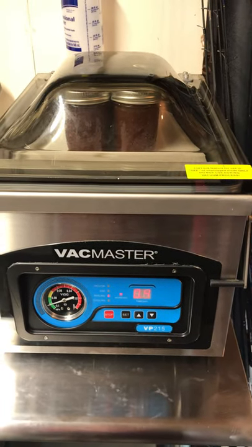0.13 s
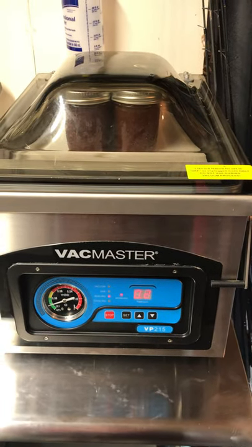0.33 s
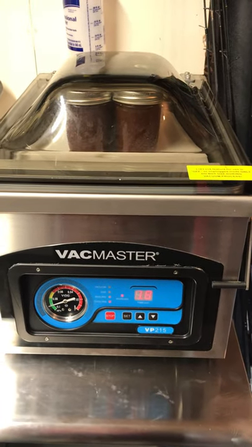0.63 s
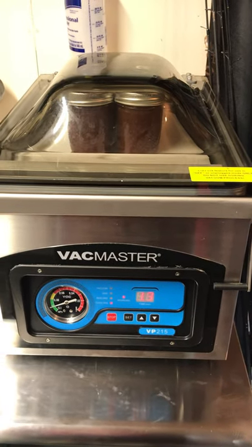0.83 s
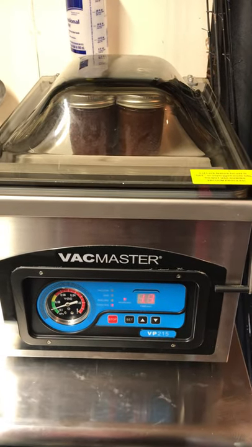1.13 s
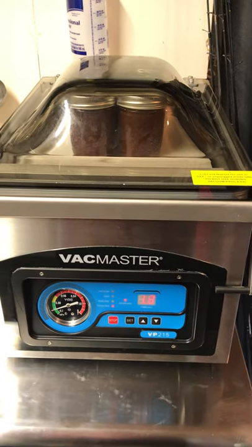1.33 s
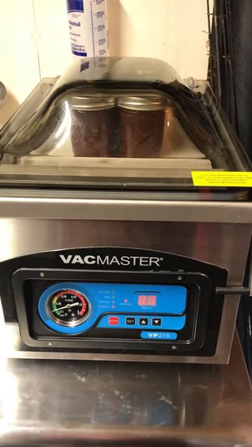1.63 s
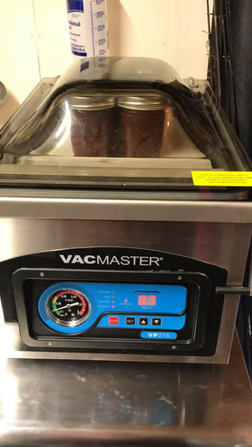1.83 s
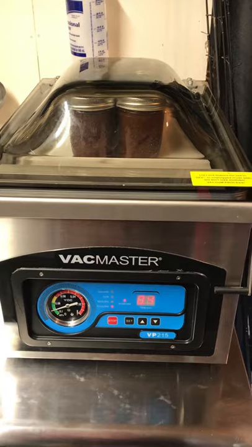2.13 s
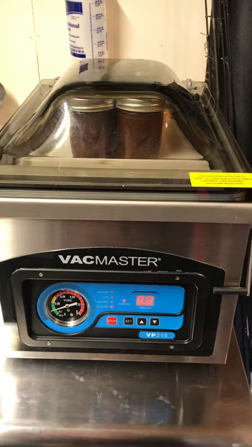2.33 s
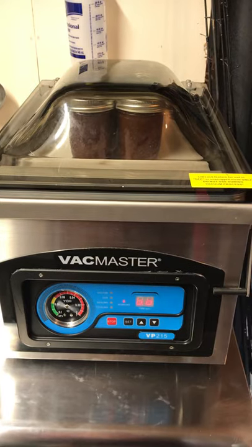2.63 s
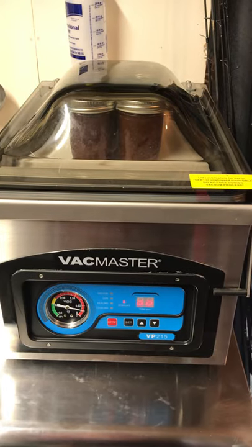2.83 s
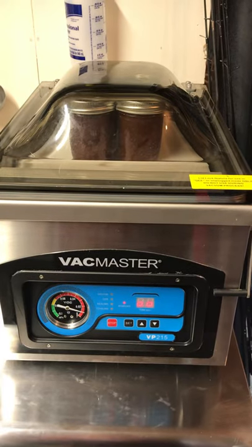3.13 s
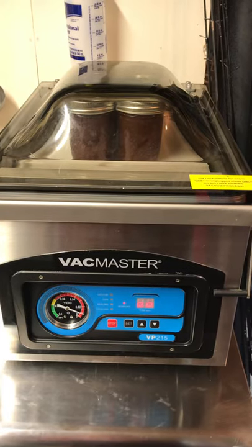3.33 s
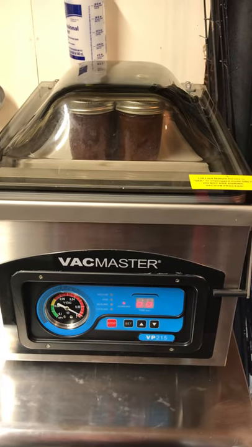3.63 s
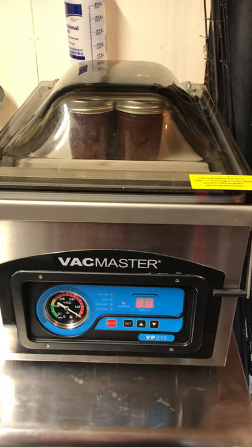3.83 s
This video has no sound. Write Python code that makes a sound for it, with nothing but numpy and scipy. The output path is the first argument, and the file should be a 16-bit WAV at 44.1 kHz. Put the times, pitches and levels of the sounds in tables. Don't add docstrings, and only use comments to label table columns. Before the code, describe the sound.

Air roars back into a chamber vacuum machine, close in a small room. It begins with faint electrical hum, soft hiss and a low pump rumble dying away. At 0.6 s a relay clicks with a tiny bounce. Around 2.6 s a brief light chatter leads into a loud metallic valve slam, then a bright, turbulent rush surges, drops back, swells unevenly and grows duller towards 4 s.

```python
import sys
import numpy as np
from scipy import signal
from scipy.fft import rfft, irfft
from scipy.io import wavfile
from scipy.ndimage import uniform_filter1d

SR = 44100
rng = np.random.default_rng(int(sys.argv[2]) if len(sys.argv) > 2 else 0)


def master(y):
    cut = np.clip(np.atleast_2d(y).T, -1, 1)
    pcm = np.round(cut * 32767)
    wavfile.write(sys.argv[1], SR, pcm.astype(np.int16))


def to_linear_factor(level_db):
    exponent = np.asarray(level_db, float) / 20
    return 10 ** exponent


N = 176400


def evened(x):
    return x / np.sqrt(np.mean(x ** 2) + 1e-20)


def read(points, hz):
    f, value = np.transpose(points)
    return np.interp(np.log(hz + 1), np.log(f + 1), value)


def shaped(gain, patch_db, gust_db):
    real, imag, wander = rng.standard_normal((N // 256 + 5, 513, 3)).T
    gusts = evened(uniform_filter1d(wander[0], size=9))
    patches = uniform_filter1d(wander, size=14, axis=0)
    patches = evened(uniform_filter1d(patches, size=12, axis=1))
    spectra = (real + 1j * imag) * gain * to_linear_factor(patch_db * patches + gust_db * gusts)
    return evened(signal.istft(spectra, nperseg=1024, noverlap=768)[1][:N])


def peaks(table, hz, order):
    return sum(to_linear_factor(db) ** 2 / (1 + (2 * (hz - f) / w) ** order) for f, w, db in table)


def coloured(x, gain_of_hz):
    return irfft(rfft(x) * gain_of_hz(np.fft.rfftfreq(N, 1 / SR)), N)


def tones(table):
    total = np.zeros(N)
    for f, width, db in table:
        noise = rng.standard_normal(N)
        total += to_linear_factor(db) * evened(coloured(noise, lambda hz: np.sqrt(peaks([(f, width, 0)], hz, order=4))))
    return total


# [f/Hz, t60/s]
ROOM_DECAY = [(200, 0.28), (1000, 0.3), (4000, 0.35), (14000, 0.21)]


def room(x, wet_db):
    size = SR // 2
    taps = np.zeros(size)
    at = np.arange(100, size - 12, 12)
    taps[at + rng.integers(0, 12, len(at))] = rng.choice([-1., 1.], len(at))
    hz, t, spectra = signal.stft(taps, SR, nperseg=256)
    fade = to_linear_factor(-60 * t / read(ROOM_DECAY, hz)[:, None])
    tail = signal.istft(spectra * fade, SR, nperseg=256)[1]
    return x + to_linear_factor(wet_db) * signal.fftconvolve(x, tail / np.linalg.norm(tail))[:N]


def strike(hits, modes, crack, crack_db, crack_t60, wet_db, rise_s=0.00016):
    detune = .008
    t, out = np.arange(SR // 3) / SR, np.zeros(N)
    hz = np.fft.rfftfreq(1024, 1 / SR)
    noise = shaped(to_linear_factor(read(crack, hz))[:, None], 0, 0)
    for s, level_db in hits:
        ring = np.zeros(len(t))
        for f, db, t60 in modes:
            near_hz = f * (1 + detune * rng.uniform(-1, 1))
            ring += to_linear_factor(db - 60 * t / t60) * np.sin(2 * np.pi * (near_hz * t + rng.random()))
        at = round(s * SR)
        hit = .4 * ring + to_linear_factor(crack_db - 60 * t / crack_t60) * noise[at:at + len(t)]
        out[at:at + len(t)] += to_linear_factor(level_db) * hit * np.minimum(t / rise_s, 1)
    return room(out, wet_db)


# [f/Hz, width/Hz, level/dB]
HOUSING = [(600, 70, -89), (1030, 90, -95), (1120, 40, -83), (1238, 40, -78), (1310, 70, -86),
           (2800, 300, -100), (3500, 400, -97), (4400, 120, -99), (5190, 40, -93), (5338, 100, -88),
           (6170, 200, -101), (7250, 300, -107)]
# [f/Hz, width/Hz, level/dB]
STEADY_TONES = [(59.2, 4, -76), (119.5, 6, -78), (4097, 14, -88), (1238, 3, -87), (7079, 14, -95),
                (531, 6, -87)]
# [f/Hz, width/Hz, level/dB]
FADING_TONES = [(226, 6, -73), (258.4, 6, -71), (290.7, 6, -76), (377, 10, -81), (608, 10, -81),
                (727, 14, -82)]


def hum():
    motor_hz, waver_share = 58.97, .0002
    closed_s, open_db, bright_from_hz = .6, -11, 2000
    sway_db, fade_db_per_s = 1.5, -4.5
    t = np.arange(N) / SR
    waver = evened(uniform_filter1d(rng.standard_normal(N), size=9000))
    turns = np.cumsum(motor_hz * (1 + waver_share * waver)) / SR
    harmonics = np.arange(8, 127)
    sizes = np.sqrt(2 * peaks(HOUSING, harmonics * motor_hz, order=4))
    sizes = sizes * to_linear_factor(.7 * rng.standard_normal(len(harmonics)))
    closing = np.where(t < closed_s, to_linear_factor(open_db), 1)
    buzz = np.zeros(N)
    for k, size in zip(harmonics, sizes):
        wave = size * np.sin(2 * np.pi * (k * turns + .3 * rng.random()))
        buzz += wave * (closing if k * motor_hz > bright_from_hz else 1)
    return buzz * to_linear_factor(sway_db * waver) + tones(STEADY_TONES) + tones(FADING_TONES) * to_linear_factor(fade_db_per_s * t)


# [f/Hz, level/dB per Hz]
HISS = [(12, -27), (20, 10.5), (65, 1.5), (241, -4.5), (802, -16.5), (1260, -13), (1610, -19), (5380, -23),
        (16000, -29)]
# [f/Hz, width/Hz, level/dB]
MIC_DIPS = [(4850, 300, -4), (7700, 600, -6), (10500, 1100, -4)]
# [f/Hz, level/dB per Hz]
RUMBLE = [(60, 1), (150, -13), (250, 7.5), (400, -7), (700, -4.5), (1200, -12), (2500, -21), (8000, -36)]


def floor():
    hiss_db, rumble_db, fade_db_per_s = -66.5, -63, -10.5
    hz, t = np.fft.rfftfreq(1024, 1 / SR), np.arange(N) / SR
    response = np.clip(1 - peaks(MIC_DIPS, hz, order=4), .1, 1)
    hiss = shaped((to_linear_factor(read(HISS, hz)) * response)[:, None], patch_db=.6, gust_db=.1)
    rumble = shaped(to_linear_factor(read(RUMBLE, hz))[:, None], patch_db=1.2, gust_db=.2)
    return to_linear_factor(hiss_db) * hiss + to_linear_factor(rumble_db + fade_db_per_s * t) * rumble


# [t/s, level/dB]
RELAY_HITS = [
    (.579, -37.5),
    (.5805, -46),
    (.5835, -33),
    (.587, -36.5),
    (.591, -42.5),
]
# [f/Hz, level/dB, t60/s]
RELAY_MODES = [(1410, -11, .12), (1600, -18, .1), (1841, -14, .13), (2213, -14, .14), (2990, -12, .16),
               (3488, -14, .13), (3817, -11, .13), (4050, -11, .12), (4312, -13, .22)]
# [f/Hz, level/dB, t60/s]
RELAY_TOP = [(7360, -14, .04), (10300, -12, .03), (11640, -11, .03), (12100, -11, .03), (12460, -10, .03),
             (13200, -9, .03)]
# [f/Hz, level/dB per Hz]
RELAY_CRACK = [(250, -40), (950, -30), (1500, -10), (3800, -4), (4700, -16), (6500, -9), (12500, -3),
               (16000, -14)]


def relay():
    return strike(RELAY_HITS, RELAY_MODES + RELAY_TOP, RELAY_CRACK, crack_db=-3.5, crack_t60=.053, wet_db=-6)


# [t/s, level/dB]
RELAY_PUSH = [(.581, -42)]
# [f/Hz, level/dB, t60/s]
RELAY_BODY = [(295, -2, .15), (345, -4, .17), (390, -6, .14), (432, -9, .3), (447, -2, .2), (505, -7, .09),
              (610, -6, .1), (1060, -9, .08)]


def relay_body():
    return strike(RELAY_PUSH, RELAY_BODY, RELAY_CRACK, crack_db=-40, crack_t60=.05, wet_db=-8, rise_s=.016)


# [t/s, level/dB]
CHATTER_HITS = [
    (2.618, -40),
    (2.6215, -43),
    (2.6245, -44),
    (2.6272, -45),
    (2.6302, -45),
    (2.6345, -42),
    (2.6365, -40),
    (2.6385, -38),
]
# [f/Hz, level/dB, t60/s]
CHATTER_MODES = [(5700, 3, .013), (7400, -7, .008), (9300, -6, .008), (11500, -5, .008), (1100, -12, .02)]
# [f/Hz, level/dB per Hz]
VALVE_CRACK = [(60, -40), (184, -4), (822, 1.5), (2840, -3), (5860, 4), (6580, 2), (16000, -3)]


def chatter():
    return strike(CHATTER_HITS, CHATTER_MODES, VALVE_CRACK, crack_db=-14, crack_t60=.01, wet_db=-13)


# [t/s, level/dB]
VALVE_HITS = [
    (2.6405, -13.5),
    (2.6412, -5.5),
    (2.6445, -10),
    (2.648, -9.5),
    (2.651, -25),
    (2.657, -15.5),
    (2.669, -40),
    (2.674, -21),
]
VALVE_HZ = [1250, 1760, 2030, 3400, 3795, 4210, 5372, 5765, 6150, 6535, 7300, 9310, 11400]
VALVE_DB = [-12, -12, -9, -8, -8, -9, -12, -1, -8, -8, -11, -7, -10]
VALVE_T60 = [0.034, 0.023, 0.022, 0.049, 0.025, 0.045, 0.059, 0.037, 0.051, 0.026, 0.08, 0.057, 0.061]


def valve():
    modes = list(zip(VALVE_HZ, VALVE_DB, VALVE_T60))
    return strike(VALVE_HITS, modes, VALVE_CRACK, crack_db=-4.5, crack_t60=.027, wet_db=-8.5)


# [t/s, level/dB]
VALVE_PUSH = [(2.6412, -6)]
# [f/Hz, level/dB, t60/s]
VALVE_BODY = [(150, -9, 0.097), (188, -2.5, 0.083), (295, -12.5, 0.065), (700, -5, 0.06), (1034, 1, 0.074),
              (5700, 6.5, 0.052), (5510, 6, 0.051), (6020, 4, 0.033)]


def valve_body():
    return strike(VALVE_PUSH, VALVE_BODY, VALVE_CRACK, crack_db=-41, crack_t60=.05, wet_db=-7.5, rise_s=.0032)


# [t/s, level/dB, treble tilt/dB per octave]
FLOW = [
    (2.661, -16.5, 0),
    (2.698, -26.5, 2),
    (2.77, -27.5, 2),
    (2.84, -25, 0),
    (2.9, -25, 2.5),
    (3.05, -23.5, 1),
    (3.2, -26, 2),
    (3.45, -24.5, 0),
    (3.7, -26, -0.46),
    (4.0, -29, -1.5),
]
# [f/Hz, level/dB per Hz]
JET = [(35, -67), (60, -42), (184, -7.5), (749, -7), (991, -3), (1410, -3.5), (4320, -3), (4860, -6),
       (16000, -23.5)]
# [f/Hz, width/Hz, level/dB over the jet]
CAVITY = [(184, 99, 0), (1002, 127, 8), (1150, 250, 5), (1777, 365, 1.5), (3244, 530, 2.5), (4140, 440, 4),
          (4485, 130, 9.5), (6140, 450, 2), (7200, 920, -5), (8980, 1250, 5.5), (13840, 4560, 5)]
PANEL_HZ = [1009, 1755, 1923, 2040, 2335, 2530, 3148, 3407, 3491, 3840, 4050, 4235, 4365, 4518]
PANEL_WIDTH = [50, 40, 30, 70, 40, 50, 40, 35, 30, 70, 35, 25, 70, 40]
PANEL_DB = [9, 9, 13, 9, 8, 3, 7, 8, 6, 9, 6, 10, 10, 7]
# [f/Hz, width/Hz, level/dB over the jet]
LOW_AIR = [(520, 62, 3.5), (671, 20, 6)]
# [f/Hz, width/Hz, level/dB]
RIM = [(5750, 51, -6), (6670, 110, -5), (7050, 44, -3.5), (7400, 200, -3.5), (8120, 55, -2),
       (8380, 66, -5.5), (9470, 53, 2), (11500, 60, -9), (12400, 50, -12), (13300, 86, -8), (13600, 44, -1),
       (14000, 120, -5), (14400, 46, 4), (15000, 44, -5)]


def air():
    open_s, rush_s, pivot_hz = 2.642, .022, 2460
    tone_hz, sink_hz_per_s, tone_width_hz, tone_db = 14600, 2600, 700, 3.
    rim_db, flutter_db, gust_db = 13, 2, .22
    s, level_db, tilt_db = np.transpose(FLOW)
    hz, t = np.fft.rfftfreq(1024, 1 / SR), np.arange(N) / SR
    frame_s = np.arange(N // 256 + 5) * 256 / SR
    octaves = np.log2(np.maximum(hz, pivot_hz) / pivot_hz)[:, None]
    tilt = to_linear_factor(octaves * np.interp(frame_s, s, tilt_db))
    off_hz = hz[:, None] - tone_hz + sink_hz_per_s * (frame_s - open_s)
    tilt *= to_linear_factor(tone_db * np.exp(-(off_hz / tone_width_hz) ** 2))
    panels = list(zip(PANEL_HZ, PANEL_WIDTH, PANEL_DB)) + LOW_AIR
    panels = panels + [(f, w, db + rim_db) for f, w, db in RIM]
    jet = shaped(tilt, 0, gust_db)
    roar = coloured(jet, lambda f: to_linear_factor(read(JET, f)) * np.sqrt(1 + peaks(CAVITY, f, order=6)))
    flutter = shaped(tilt, flutter_db, gust_db)
    roar += coloured(flutter, lambda f: to_linear_factor(read(JET, f)) * np.sqrt(peaks(panels, f, order=2)))
    opening = np.clip((t - open_s) / rush_s, 0, 1)
    return room(evened(roar) * to_linear_factor(np.interp(t, s, level_db)) * opening, wet_db=-6)


def thud():
    at_s, push_hz, level_db, width_s = 2.9, 60, -48, .033
    t = np.arange(N) / SR - at_s
    return to_linear_factor(level_db) * np.exp(-(t / width_s) ** 2) * np.sin(2 * np.pi * push_hz * t)


def scene():
    contacts = relay() + valve()
    cabinet = relay_body() + valve_body()
    mix = contacts + cabinet + chatter() + floor() + hum() + air() + thud()
    return np.tile(mix, (2, 1))


def low_pass(x):
    return signal.sosfilt(signal.butter(12, 16470, fs=SR, output="sos"), x)


def record(dry):
    low_hz, edge_hz, ceiling = 45, 15710, 1.3
    low_cut = signal.sosfilt(signal.butter(2, low_hz, "high", fs=SR, output="sos"), dry)
    limited = np.tanh(low_cut / ceiling) * ceiling
    edge = signal.firwin(1201, edge_hz, window=("kaiser", 8), fs=SR)
    mix = signal.oaconvolve(limited, edge[None], "same")
    return low_pass(mix)


dry = scene()
out = record(dry)
master(out)
```